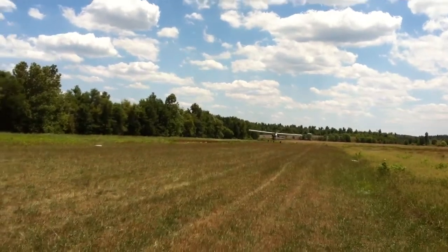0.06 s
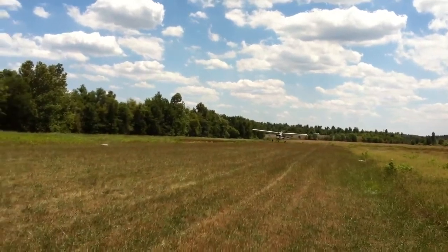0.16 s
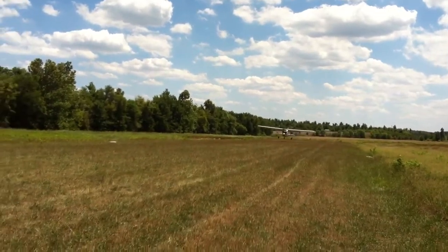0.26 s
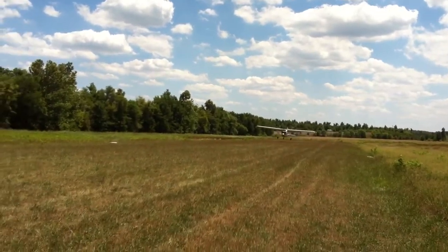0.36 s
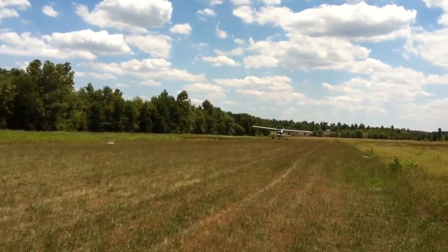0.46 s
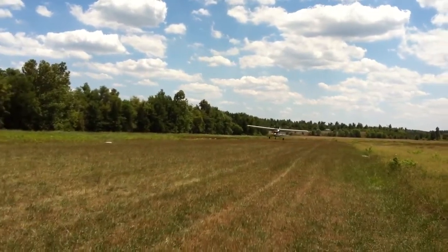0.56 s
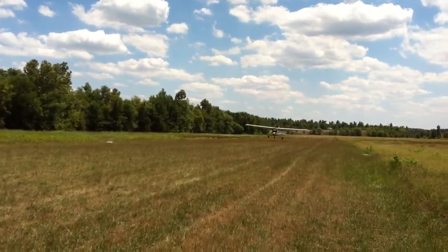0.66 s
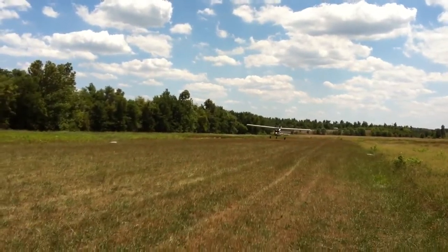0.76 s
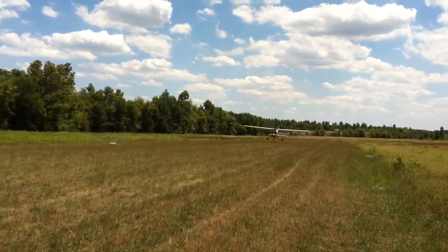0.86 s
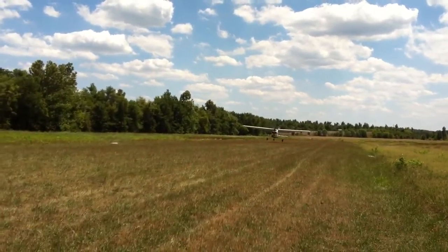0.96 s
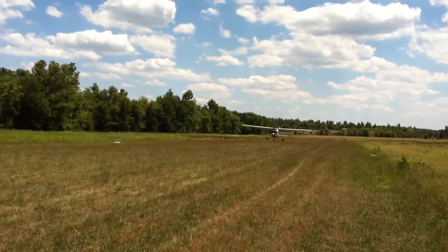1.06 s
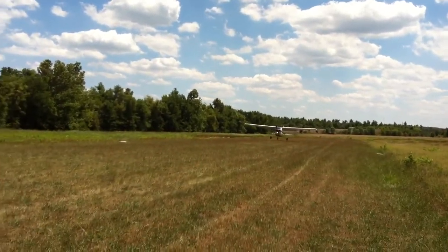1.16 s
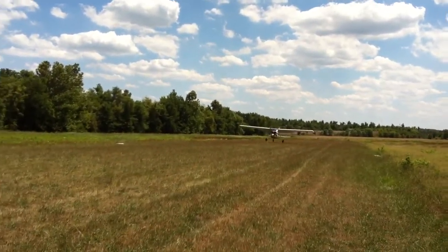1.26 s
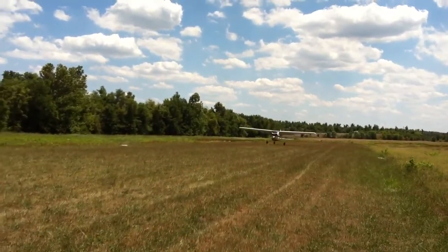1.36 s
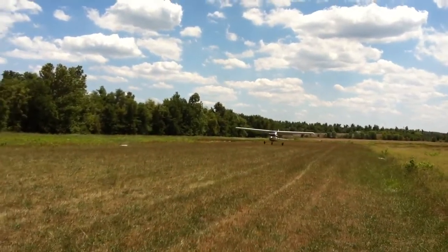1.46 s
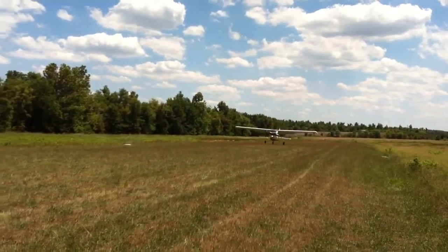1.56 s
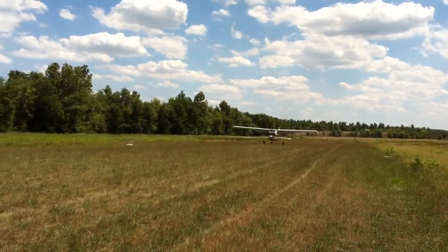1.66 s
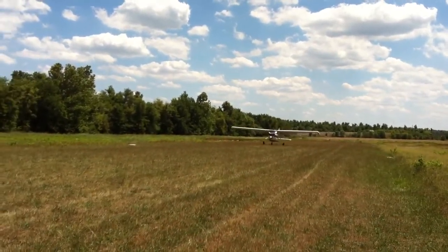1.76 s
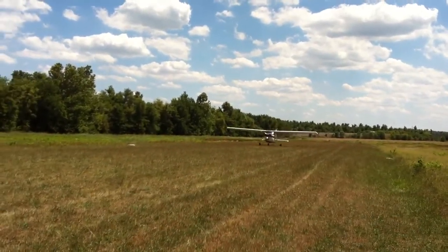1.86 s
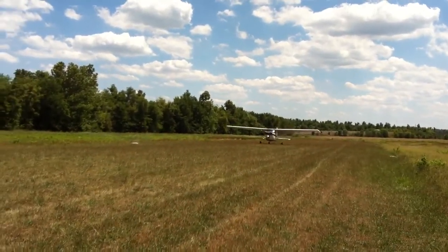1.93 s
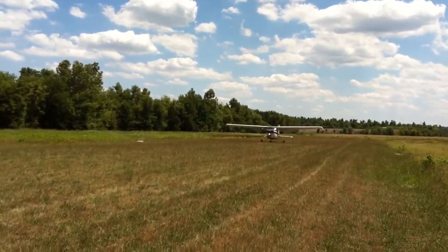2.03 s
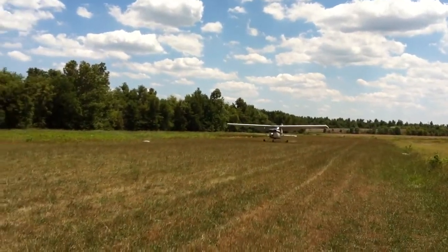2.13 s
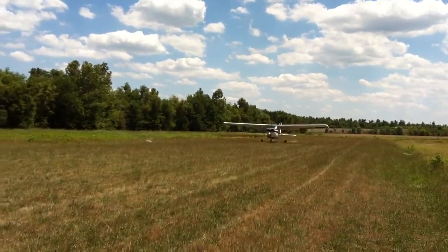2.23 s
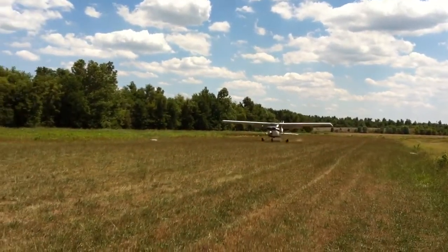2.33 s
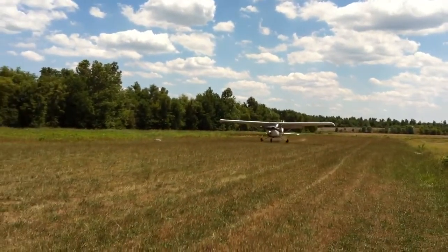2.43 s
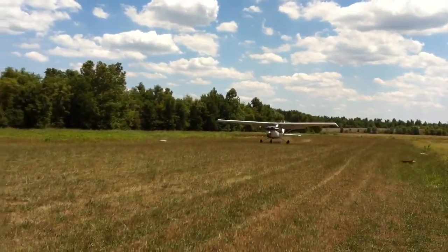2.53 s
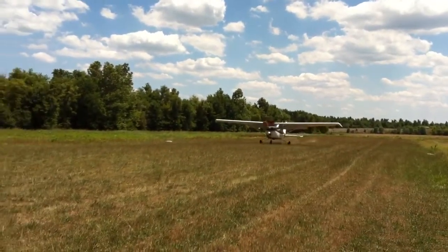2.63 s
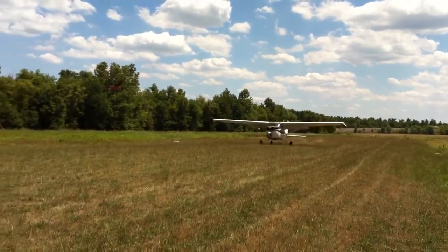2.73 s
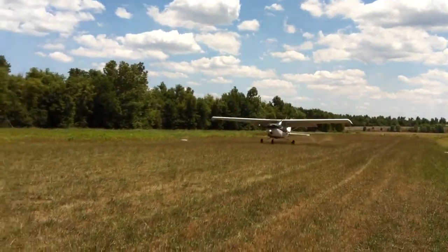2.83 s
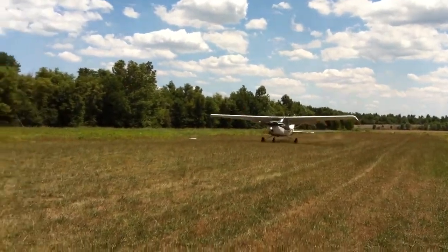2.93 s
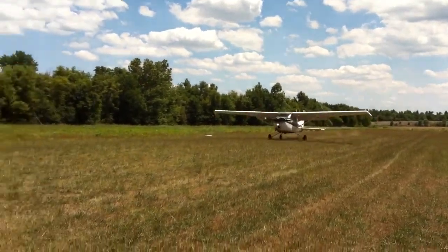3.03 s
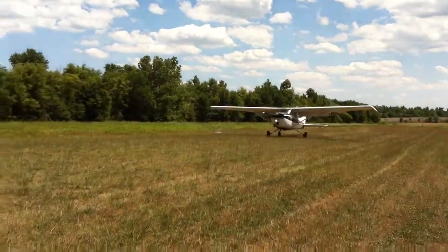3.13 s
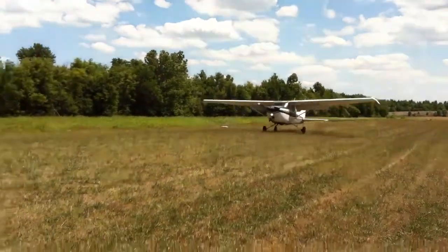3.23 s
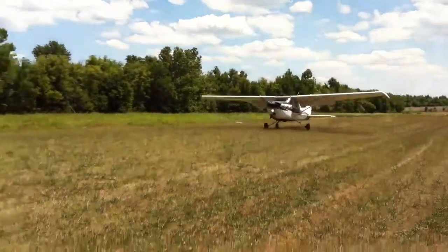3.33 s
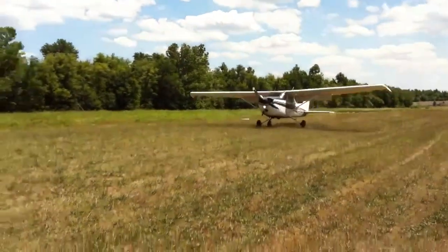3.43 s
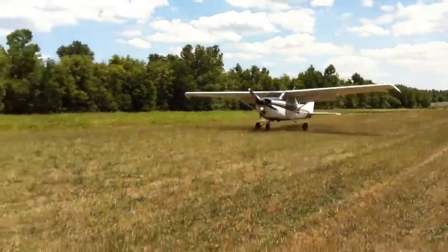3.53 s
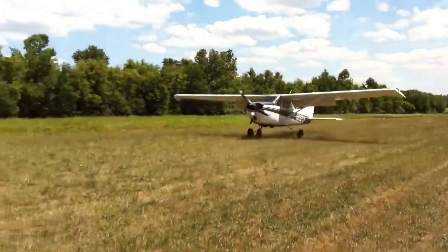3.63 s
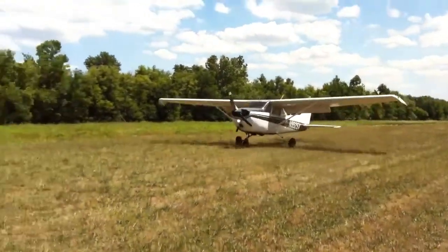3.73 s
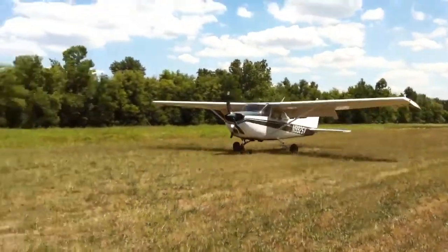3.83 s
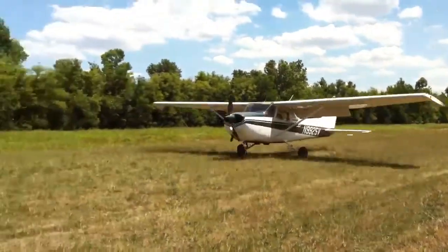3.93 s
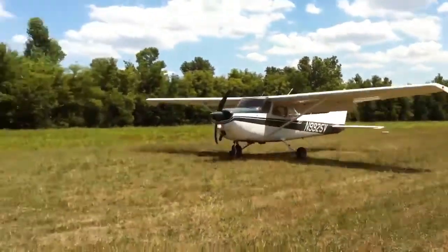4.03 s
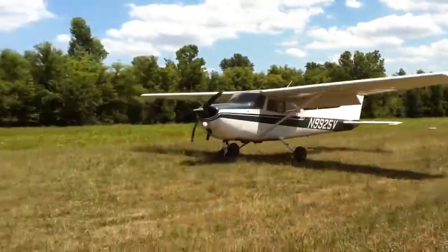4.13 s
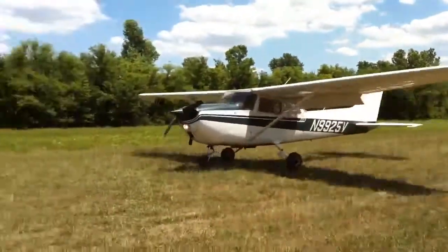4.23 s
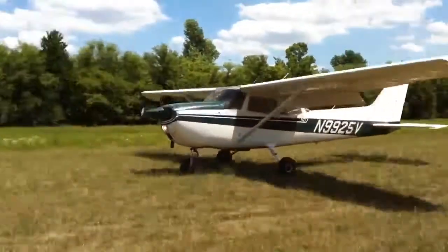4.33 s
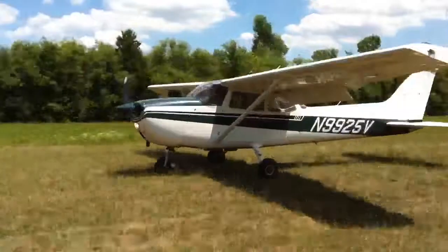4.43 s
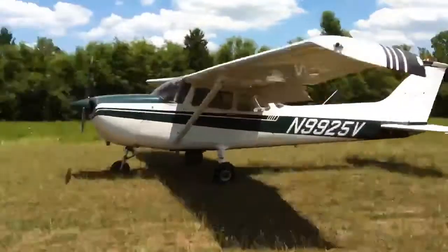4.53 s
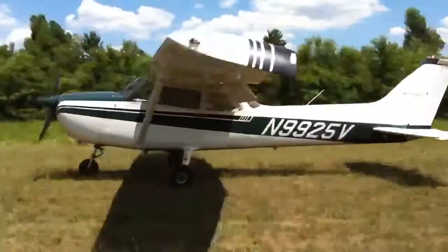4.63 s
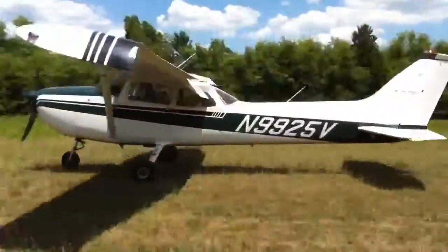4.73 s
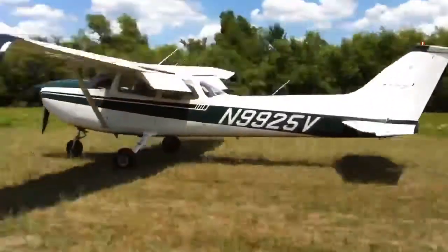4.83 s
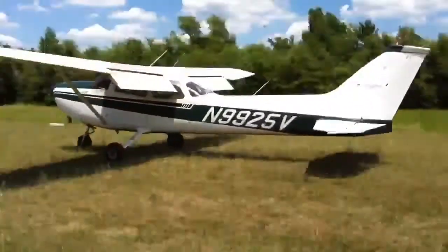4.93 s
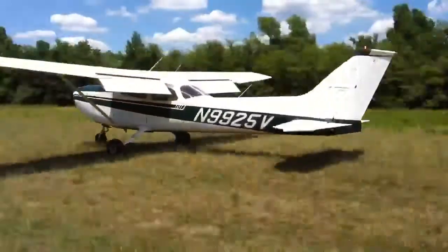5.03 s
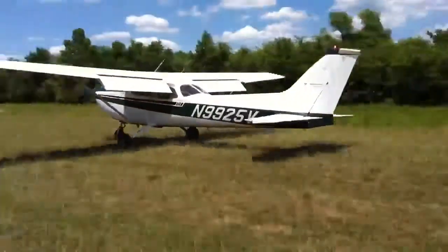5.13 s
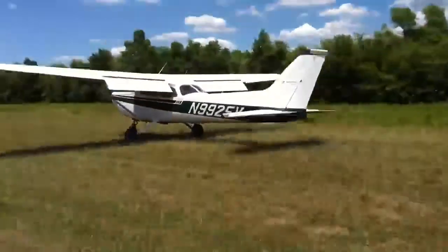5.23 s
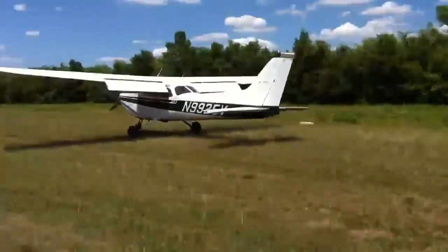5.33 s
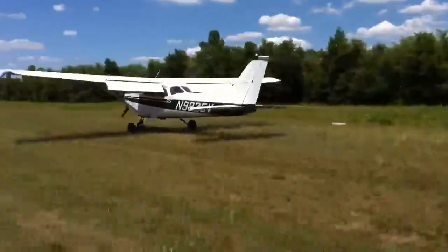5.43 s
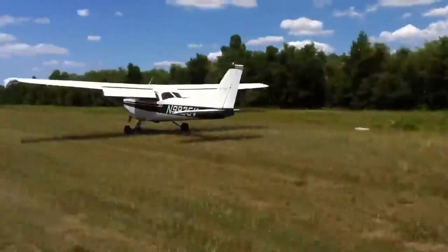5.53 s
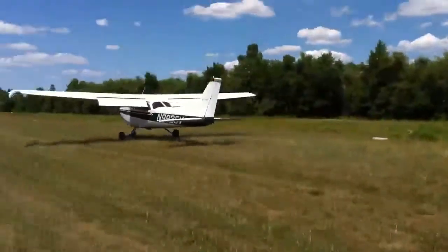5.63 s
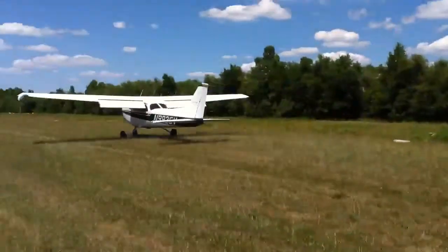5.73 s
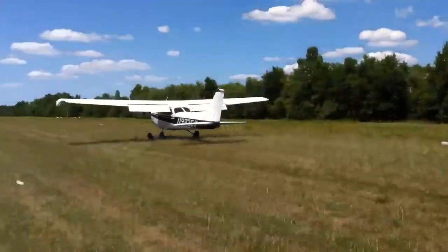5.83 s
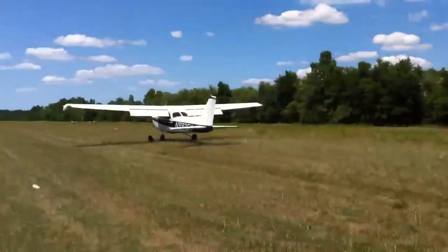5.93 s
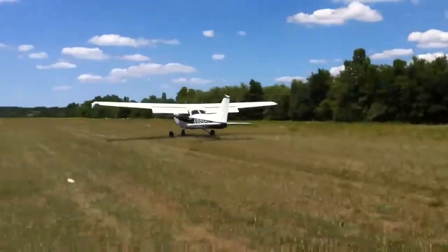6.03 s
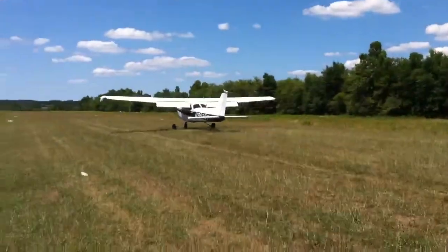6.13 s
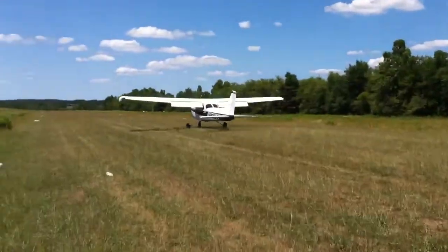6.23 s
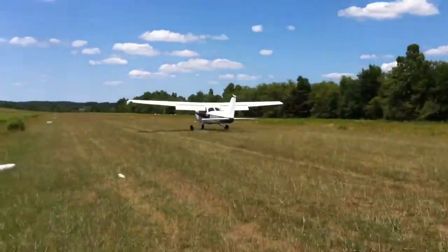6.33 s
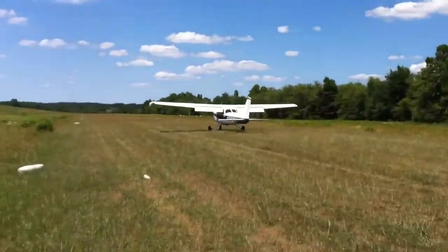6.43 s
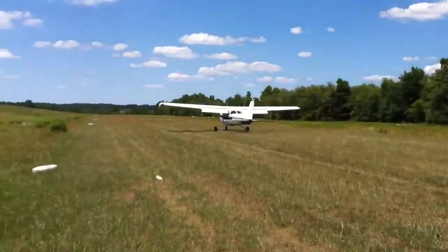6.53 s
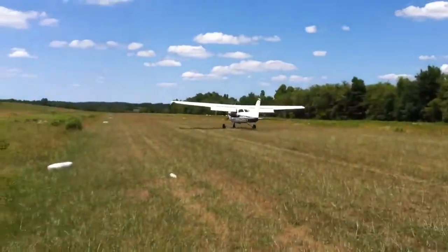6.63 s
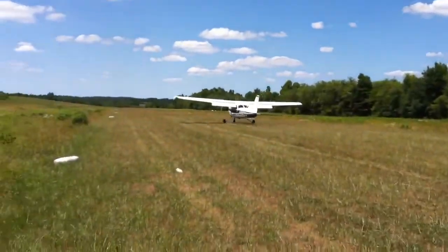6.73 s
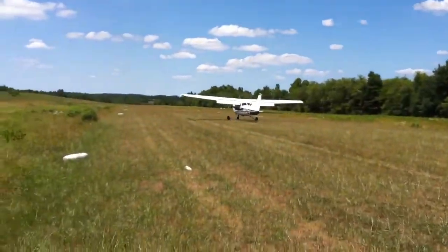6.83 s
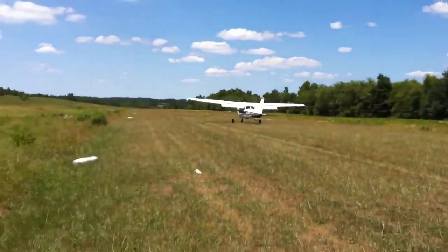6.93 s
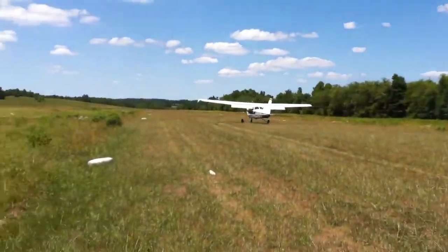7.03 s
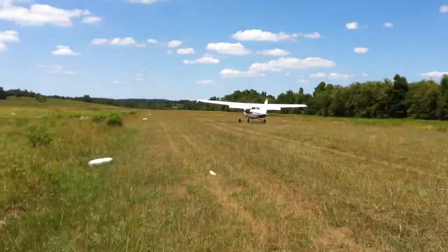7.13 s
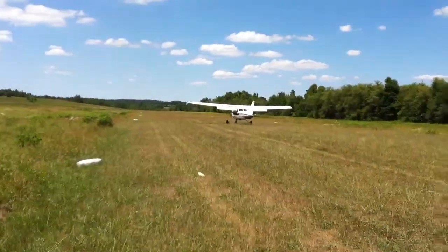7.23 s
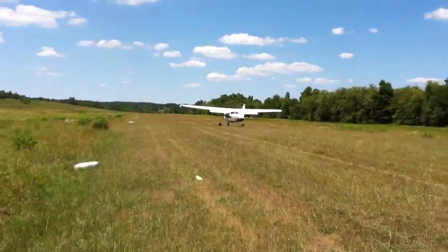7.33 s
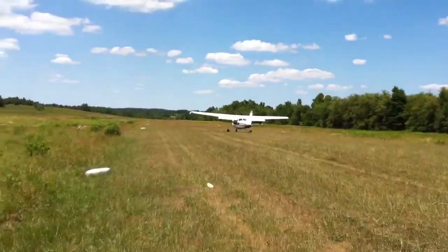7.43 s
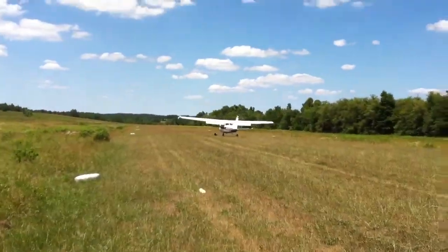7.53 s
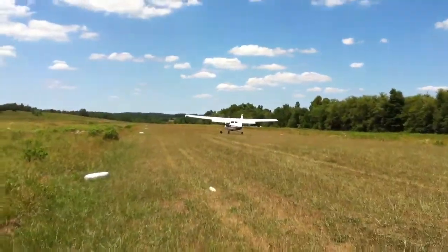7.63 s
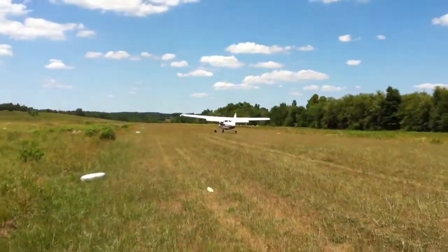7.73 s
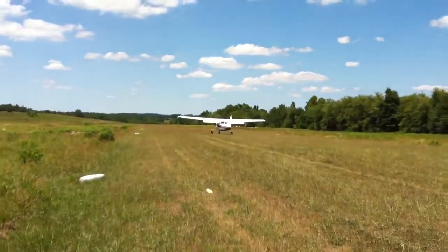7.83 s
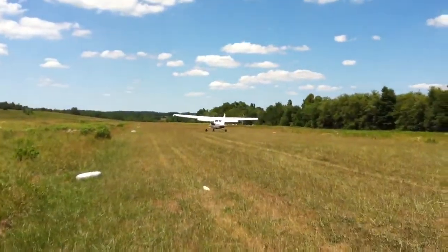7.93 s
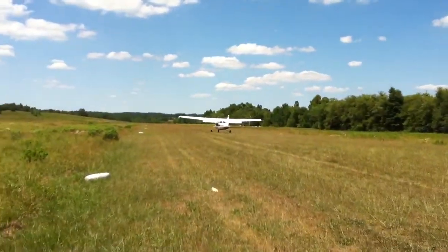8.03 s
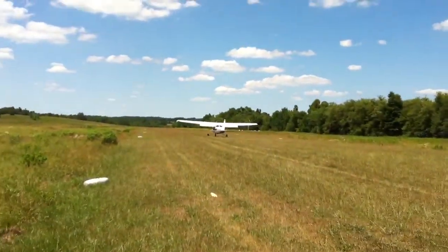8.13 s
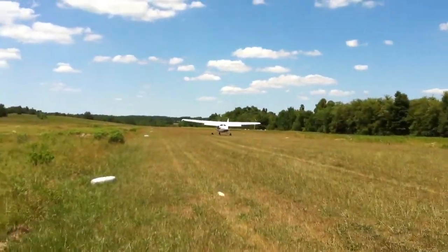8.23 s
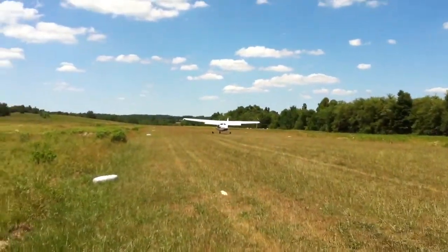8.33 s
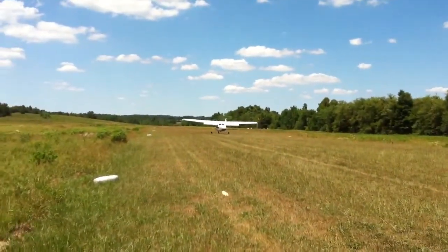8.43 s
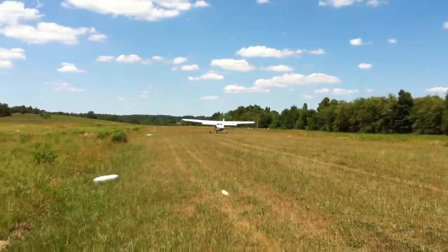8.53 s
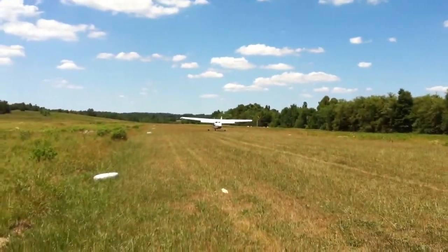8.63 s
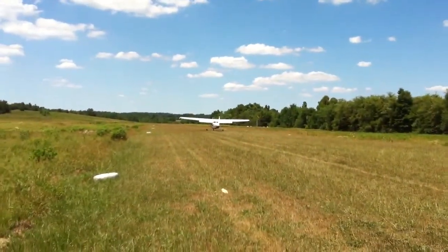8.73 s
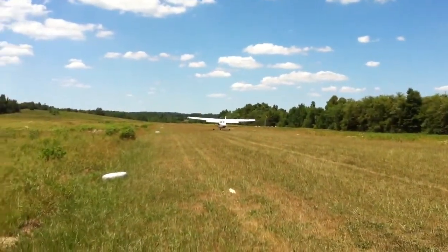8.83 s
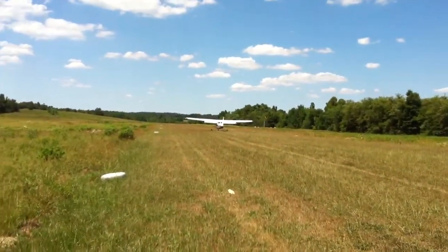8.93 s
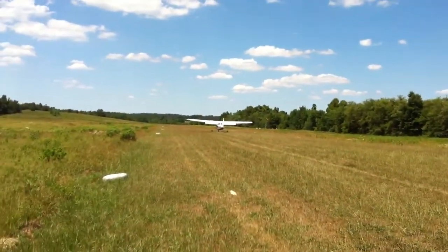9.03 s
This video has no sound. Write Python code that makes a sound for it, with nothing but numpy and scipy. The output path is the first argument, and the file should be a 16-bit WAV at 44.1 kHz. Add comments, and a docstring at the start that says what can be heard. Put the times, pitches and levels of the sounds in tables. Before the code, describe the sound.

Heard from the edge of an open field, a light plane's pulsing exhaust and raspy propeller build from a distance. About halfway through it rolls past close and loud, wheels crunching over dry grass, metal rattling on bumps and brakes faintly singing, as its wash rumbles on the microphone. The drone then falls in pitch and recedes, leaving room for a few small nearby rustles of cloth and snaps of stalks.

```python
"""A light single-engine propeller plane rolls along a dry grass strip, passes a few metres off and recedes.
Its firings drive uneven exhaust thuds and ring the tailpipe; the blades drone and rasp and the engine
clatters, all falling in pitch by the Doppler effect. The tyres hiss and crunch, bumps rattle the airframe,
the brakes sing faintly and the propeller's wash buffets the microphone.
As the plane fades, clothing rustles and dry stalks crackle close by, over the faint air of the field."""
import sys
import numpy as np
from scipy import signal
from scipy.fft import rfft, irfft, next_fast_len
from scipy.io import wavfile
from scipy.ndimage import uniform_filter1d, map_coordinates

SR = 44100
rng = np.random.default_rng(int(sys.argv[2]) if len(sys.argv) > 2 else 0)


def store_wav(level_fs):
    """Save 16-bit WAV to argv[1]."""
    pcm = np.round(np.clip(np.atleast_2d(level_fs), -1, 1) * 32767)
    wavfile.write(sys.argv[1], SR, pcm.T.astype(np.int16))


N = 399987

# Spectra of the sources. Each row: frequency in Hz, relative spectral level in dB.
AIR_SPECTRUM = [(30, -13), (150, 6), (450, -8), (900, -7), (2200, -16), (4500, -19), (8000, -21),
                (11000, -24), (16000, -23)]
CLOTH_SPECTRUM = [(400, -29), (950, -2.5), (1500, -10.5), (2300, -3.5), (3800, -8.5), (8000, -4),
                  (11000, -5), (14000, -8), (16000, -17)]
WASH_SPECTRUM = [(25, -10), (45, -13), (75, -9), (105, 3), (150, 3), (400, -49)]
RATTLE_SPECTRUM = [(300, -38), (750, 2), (1200, -12.5), (2250, 5), (3200, 1.5), (4500, -7.5), (6200, 1),
                   (9000, -2.5), (10800, -9), (16000, -13)]
TYRE_SPECTRUM = [(900, -14), (3300, -16.5), (4000, -12), (5050, -10), (5600, -1.5), (7400, 0.5),
                 (8700, 3.5), (9600, 0.5), (10600, -8.5), (13000, -4.5), (16000, -30)]
STRAW_SPECTRUM = [(5000, -5), (9500, -18), (11000, 1), (12500, 1.5), (14500, 2), (16000, -13)]
CLATTER_SPECTRUM = [(150, -24.5), (380, -11), (500, -1), (720, 0.5), (900, 0.5), (1200, -1.5), (1580, 0),
                    (1900, -0.5), (2220, 1.5), (2600, -2.5), (3450, -5), (3950, -15.5), (7000, -8),
                    (16000, -83)]
GAS_SPECTRUM = [(25, -43.5), (70, -34), (110, -7), (170, 1.5), (230, 0.5), (310, -1.5), (400, -8),
                (480, -13.5), (1200, -84)]
THUD_SPECTRUM = [(25, -45), (55, -20), (95, -5.5), (150, 1), (205, 3.5), (320, -6), (420, -18), (800, -12),
                 (1500, -25), (4000, -59)]
FIBRE_SPECTRUM = [(600, -2), (1700, 9), (4500, 6.5), (6000, 4.5), (9300, 7), (10800, -9), (16000, -15)]
WAKE_SPECTRUM = [(2500, -24), (3900, 9), (4900, -6), (7000, -30)]
RASP_SPECTRUM = [(400, -22.5), (620, -1), (860, 0), (1100, -7), (1350, -5.5), (1900, -15), (4000, -59)]
PIPE_SPECTRUM = [(300, -46.5), (560, -10.5), (720, -4.5), (880, -7), (1400, -54), (4000, -62)]
COWL_SPECTRUM = [(450, -21), (720, 1), (1000, 1), (1300, 2), (1650, -5), (1950, -18), (2800, -26),
                 (3400, -18), (3900, -34)]
# Clothing brushes and stalks crack. Each row: peak time in seconds, level in dB, length in seconds,
# resonance in Hz.
CLOTH_BRUSHES = [(7.283, -52.5, 0.017, 2300), (7.522, -57, .03, 1400), (7.576, -50.5, 0.008, 1000),
                 (7.627, -54, .009, 1700), (8.748, -55, 0.005, 1400), (8.782, -54.5, .018, 1350)]
STALK_CRACKS = [(.208, -58.5, .0015, 3500), (7.701, -51.5, 0.005, 4800), (7.718, -50, 0.002, 8000),
                (7.737, -49.5, .0022, 8500), (7.814, -49, .003, 7800), (7.891, -48.5, .0032, 6500),
                (7.965, -54.5, 0.0013, 7130), (8.04, -54.5, 0.0017, 4500), (8.203, -55, 0.0057, 7380),
                (8.227, -54.5, 0.0017, 7000), (8.311, -47.5, .0036, 6800), (8.312, -44, 0.0062, 2200),
                (8.341, -45, .0015, 8350)]
# Brake squeals. Each row: peak time in seconds, level in dB, length in seconds, then pitch, upward bend
# and random waver in Hz.
BRAKE_SQUEALS = [(2.725, -57, .05, 6980, 520, 25), (4.968, -44, .006, 8650, 0, 180),
                 (5.135, -42, .02, 8880, 0, 130), (5.285, -39.5, .026, 8790, 0, 120),
                 (5.44, -49, .035, 9450, 0, 220), (5.78, -54, .11, 9380, 0, 150)]
# The hardest bumps. Each row: time in seconds, peak level in dB, length in seconds, treble gain in dB.
HARD_BUMPS = [(3.335, -37, .006, 4), (3.463, -27, 0.0071, -7), (3.559, -29.5, 0.011, -5),
              (3.843, -26.5, 0.0054, -1), (4.01, -23.5, 0.005, -12), (4.115, -16.5, 0.0046, -3),
              (4.36, -20.5, 0.026, -3), (4.521, -21, 0.014, 3), (4.572, -12.5, 0.0061, -5),
              (4.65, -16, 0.0098, -3), (5.04, -21.5, 0.0044, -13), (5.123, -28.5, 0.014, 6.5),
              (5.269, -22, 0.0051, -4), (5.287, -23, 0.015, -1.5), (5.414, -37, 0.0049, 14.5),
              (5.772, -27.5, 0.0089, -5), (5.795, -24.5, 0.0027, -7), (5.839, -27, 0.0025, -4.5),
              (6.07, -30, 0.004, -3), (6.119, -31, 0.0033, -3), (6.452, -43, 0.0082, 5)]
# Modes of the engine's sheet metal. Each row: frequency in Hz, bandwidth in Hz, relative level in dB.
METAL_MODES = [(906, 85, -11), (1616, 150, -9.5), (2190, 100, -10), (2920, 170, -14.5)]
# Propeller tones. Each row: multiple of the blade rate, relative level in dB.
BLADE_HARMONICS = [(2, -3), (4, 4.5), (7, -7), (10, -6.5), (13, -8)]
# The engine winds down, stumbling once. Each row: time in seconds, firings per second at the source.
FIRING_RATE = [(0, 32.29), (1.2, 31.59), (1.76, 31.44), (1.88, 29.56), (2.08, 30.74), (2.7, 30.6),
               (3.7, 30.11), (4.2, 29.04), (5.2, 29.03), (8, 28.01)]
# The plane's sound swells and dips. Each row: time in seconds, gain in dB.
PASS_SURGES = [(0, -1), (1.9, -4.5), (2.4, 0.5), (2.76, 0.5), (2.96, 4), (3.46, 3), (3.88, -0.5),
               (4.08, 1.5), (4.44, -4), (4.58, 2), (4.76, -1.5), (4.92, -3), (5.28, 4), (5.58, -0.5),
               (6.06, 2), (6.2, 0), (7.04, 0), (7.22, 3.5), (8.12, -2), (8.35, 0), (9.07, 0)]
# Blade rasp and tyre hiss along the run. Each row: time in seconds, rasp gain in dB, hiss gain in dB.
RASP_AND_HISS = [(0, -4, -1), (0.9, 3, 0.5), (1.4, 2, 3.5), (1.9, 1.5, 4.5), (2.3, 3, -0.5),
                 (2.55, -6.5, -0.5), (3.02, -4, -1), (3.25, -21, -0.5), (3.7, 1, -3.5), (4.3, 8.5, 1.9),
                 (4.9, 0, -2.5), (5.3, -4, 2)]
# The low sound as the plane turns its tail to the listener. Each row: time in seconds, then the gains
# of thuds, gas rumble and propeller in dB.
LOW_BALANCE = [(0, -8, -11, -4), (0.95, -1.5, -10, -4.5), (1.47, -2.5, -8.5, -4), (1.68, 3.5, -7, -3),
               (1.85, -1, -4, -3), (2.1, -1.5, -3.5, -4), (2.35, -4, 0.5, -6), (2.75, -9, -5.5, -11),
               (3.0, -9, -2.5, -12.5), (3.55, -8, -5.5, -13), (4.3, -9, 1.5, -14.5), (4.78, -11, 1.5, -18),
               (5.03, -13, -3, -19), (5.38, -12.5, -3, -22), (6.4, -11.5, -1.5, -22), (7.7, -13, -4.5, -22),
               (9.07, -13, -4.5, -22)]

# How each source carries: gain abreast in dB, loss per doubling of distance in dB, gain tail-on in dB.
EXHAUST_CARRY, GROWL_CARRY, CLATTER_CARRY = (-32.5, 8.1, 2.5), (-41.5, 14.8, 3.5), (-32, 11.12, 0.87)
TYRE_CARRY, RASP_CARRY = (-33.5, 12.88, 0.46), (-53, 6.8, -8.5)
CLOSEST_S, CLOSEST_M, SPEED_M_PER_S, SOUND_M_PER_S = 4.55, 9, 18, 343
TIME = np.arange(N) / SR


def amp(db):
    """Amplitude ratio of a level in decibels."""
    return 10 ** (np.asarray(db) / 20)


def unit(x):
    """Normalisation to rms 1."""
    return x / np.sqrt(np.mean(x ** 2) + 1e-20)


def curves(rows):
    """Linear interpolation in time of each column after the first."""
    times, *columns = np.transpose(rows)
    return [np.interp(TIME, times, column) for column in columns]


def noise():
    """White Gaussian noise."""
    return rng.standard_normal(N)


def wobble(rate):
    """Smooth random modulation: a spline through rate knots a second."""
    return map_coordinates(rng.standard_normal(int(N * rate / SR) + 4), [TIME * rate])


def coloured(x, spectrum):
    """Minimum-phase filtering of x by a spectrum, at rms 1."""
    size = 2 * next_fast_len(N // 2 + 8192)
    hz, db = np.transpose(spectrum)
    gain = amp(np.interp(np.log(np.fft.rfftfreq(size, 1 / SR) + 1), np.log(hz), db))
    cepstrum = irfft(np.log(gain))
    cepstrum[1:size // 2] *= 2  # folding the cepstrum makes the filter causal
    cepstrum[size // 2 + 1:] = 0
    return unit(irfft(rfft(x, size) * np.exp(rfft(cepstrum)))[:N])


def resonate(x, hz, q):
    """Forced response of one resonator with quality factor q, at rms 1."""
    return unit(signal.lfilter(*signal.iirpeak(hz, q, SR), x))


def grains(rate, spread_db):
    """Shot noise: clicks of very unequal size, rate a second, at rms 1."""
    sizes = amp(spread_db * np.minimum(rng.exponential(size=N), 4))
    return unit((rng.random(N) < rate / SR) * sizes * noise())


def ticks(rate, low_hz, high_hz, ring_s, spread_db):
    """Damped free vibrations at random times and pitches, rate a second, at rms 1."""
    when, pitch, strength = np.hsplit(rng.random((int(rate * N / SR), 3)), 3)
    t = np.arange(SR // 100) / SR
    hz = low_hz + (high_hz - low_hz) * pitch
    rings = amp(spread_db * strength ** 3) * np.sin(2 * np.pi * hz * t) * np.exp(-t / ring_s)
    at = (when * N).astype(int) + np.arange(len(t))
    return unit(np.bincount(at.ravel(), rings.ravel(), N)[:N])


def swell(peak_s, db, length_s):
    """Envelope of a transient: a Gaussian rise and a slower exponential decay."""
    age = (TIME - peak_s) / length_s
    return amp(db) * np.exp(-np.minimum(np.where(age < 0, age * age, age / 2), 20))


def scattered(start_s, end_s, length_s, spread_db, count):
    """Envelope of count unequal transients strewn over a span of time."""
    return sum(swell(start_s + (end_s - start_s) * (k + when) / count, -spread_db * weak, length_s)
               for k, (when, weak) in enumerate(rng.random((count, 2))))


def firing_gate(cycles, depth):
    """Amplitude modulation with one swell per firing, at rms 1."""
    return unit(np.exp(depth * np.cos(2 * np.pi * cycles)))


def bearing():
    """Geometry of a straight pass: distance in metres, and aspect from -1 head-on to 1 tail-on."""
    along = SPEED_M_PER_S * (TIME - CLOSEST_S)
    distance = np.hypot(along, CLOSEST_M)
    return distance, along / distance


def carried(closest_db, doubling_db, behind_db):
    """Distance loss and directivity set the gain of a source on the plane, along with the surges."""
    distance, tail_on = bearing()
    loss_db = doubling_db * np.log2(distance / CLOSEST_M)
    return amp(closest_db - loss_db + behind_db * tail_on + curves(PASS_SURGES)[0])


def doppler(x, shift, passing_s):
    """Doppler effect: a changing delay raises the pitch on approach and lowers it in retreat."""
    path = np.hypot(TIME - CLOSEST_S, passing_s)
    return map_coordinates(x, [(TIME - shift * (path - path[0])) * SR], mode="wrap")


def ground_effect(x, dip_hz=505, dip_q=3.8, dip_db=-4.5, patchy_db=1.3):
    """Soft ground absorbs one band of the passing sound, whose colour also shifts in patches."""
    band = signal.lfilter(*signal.iirpeak(dip_hz, dip_q, SR), x)
    hz, _, spectra = signal.stft(x - (1 - amp(dip_db)) * band, SR, nperseg=512)
    patches = uniform_filter1d(rng.standard_normal(spectra.shape), size=4, axis=0)
    patches = unit(uniform_filter1d(patches, size=20, axis=1))
    reach = np.minimum(hz / dip_hz / 2, 1)[:, None]  # long waves come through steadily
    return signal.istft(spectra * amp(patchy_db * reach * patches))[1][:N]


def field_air():
    """Ambient noise of the open field: faint, steady and strongest in the bass."""
    return amp(-61.5) * coloured(noise(), AIR_SPECTRUM)


def clothing():
    """Friction of nearby cloth makes bursts of grainy noise, each with its own resonance."""
    cloth = coloured(noise() + .5 * grains(rate=5800, spread_db=9), CLOTH_SPECTRUM)
    return sum(swell(s, db, length) * (amp(-3) * cloth + resonate(cloth, hz, q=4))
               for s, db, length, hz in CLOTH_BRUSHES)


def dry_stalks(q=1.5):
    """Brittle fracture excites broad resonances in nearby stalks; finer ones crackle at random."""
    snaps = noise() + .5 * ticks(rate=1400, low_hz=3050, high_hz=9830, ring_s=.0024, spread_db=3)
    fibres = coloured(snaps, FIBRE_SPECTRUM)
    cracks = sum(swell(s, db, length) * resonate(fibres, hz, q) for s, db, length, hz in STALK_CRACKS)
    crackling = amp(-56) * scattered(start_s=7.4, end_s=8.6, length_s=.0012, spread_db=6, count=38)
    return cracks + crackling * resonate(fibres, 6000, q)


def propeller_wash(peak_s=4.35, length_s=.55):
    """Turbulent pressure buffets the microphone in one deep gust as the propeller comes abreast."""
    gust = amp(-45.5) / (1 + ((TIME - peak_s) / length_s) ** 2) ** 1.5
    return gust * coloured(noise(), WASH_SPECTRUM)


def brakes():
    """Friction-excited vibration: pads graze the discs and sing in thin, unsteady tones."""
    song = np.zeros(N)
    for s, db, length, hz, bend_hz, waver_hz in BRAKE_SQUEALS:
        bend = np.minimum(((TIME - s) / length / 2) ** 2, 2)
        pitch = hz + bend_hz * bend + waver_hz * wobble(600)
        song += swell(s, db, length) * unit(np.sin(2 * np.pi * np.cumsum(pitch) / SR))
    return song


def airframe(crest_db=8.5, split_hz=4200):
    """Impact excitation: bumps shake gear and metal skin into bursts of contacts that add in power."""
    low_power = sum(swell(s, db - crest_db, length) ** 2 for s, db, length, _ in HARD_BUMPS)
    high_power = sum(swell(s, db + treble_db - crest_db, length) ** 2
                     for s, db, length, treble_db in HARD_BUMPS)
    rough_ground = scattered(start_s=3.8, end_s=4.2, length_s=.005, spread_db=5, count=22)
    rough_power = (amp(-5) * carried(*TYRE_CARRY) * rough_ground) ** 2
    contacts = ticks(rate=1800, low_hz=600, high_hz=10000, ring_s=.002, spread_db=11)
    rattle = coloured(noise() + .5 * contacts, RATTLE_SPECTRUM)
    dull = signal.sosfiltfilt(signal.butter(2, split_hz, fs=SR, output="sos"), rattle)
    return np.sqrt(low_power + rough_power) * dull + np.sqrt(high_power + rough_power) * (rattle - dull)


def tyres(cycles, flutter_db=1):
    """Wheels and slipstream crush dry grass, whose many small fractures merge into a crunching hiss."""
    flutter = amp(flutter_db * wobble(60)) * firing_gate(cycles, depth=.32)
    stalks = ticks(rate=2000, low_hz=2050, high_hz=10760, ring_s=.0014, spread_db=17)
    crush = coloured(noise() + .55 * stalks, TYRE_SPECTRUM)
    straw = coloured(noise() + .55 * grains(rate=300, spread_db=3.5), STRAW_SPECTRUM)
    near = 1 / (1 + ((TIME - 4.5) / .88) ** 2)  # the finest crackle carries only a short way
    behind = .5 + .5 * np.tanh((TIME - CLOSEST_S) / .15)
    wake = behind * coloured(noise(), WAKE_SPECTRUM)  # the slipstream's lower hiss behind the wing
    return flutter * (crush + amp(-4) * near * straw + amp(-10) * wake)


def blade_rasp(cycles):
    """Turbulence in each blade's wake gives a pulsing band of noise near 900 Hz."""
    return coloured(noise() * firing_gate(cycles, depth=.7), RASP_SPECTRUM)


def tailpipe_growl(cycles, ring_hz=755, width_hz=110):
    """Pipe resonance: a throaty note swells with each firing and falls as the plane goes by."""
    q = ring_hz / width_hz
    ring = resonate(resonate(noise(), ring_hz, q), ring_hz, q)
    return firing_gate(cycles, depth=.19) * doppler(ring, shift=.07, passing_s=.5)


def engine_clatter(cycles, flutter_db=2, pipe_fade_db_per_s=10):
    """Forced vibration: valve gear and blade swish ring the metal, the cowl ahead and the pipe behind."""
    def drive():
        """Fluttering noise excitation that pulses faintly with the firings."""
        return noise() * firing_gate(cycles, depth=.03) * amp(flutter_db * wobble(70))

    behind = .5 + .5 * np.tanh((TIME - CLOSEST_S) / .7)
    metal = sum(amp(db) * resonate(drive(), hz, hz / width) for hz, width, db in METAL_MODES)
    cowl = amp(-9) * (1 - behind) * coloured(drive(), COWL_SPECTRUM)
    absorbed_db = pipe_fade_db_per_s * np.maximum(TIME - 6.2, 0)  # the ground swallows the pipe's ring
    pipe = amp(-4 - absorbed_db) * behind * coloured(drive(), PIPE_SPECTRUM)
    clatter = amp(-.5) * coloured(drive(), CLATTER_SPECTRUM)
    return doppler(clatter + metal + cowl + pipe, shift=.03, passing_s=.5)


def propeller(cycles, dull_db_per_s=3, rough_db=4):
    """Two blades on a four-cylinder engine pass at the firing rate and radiate harmonics of it."""
    top = BLADE_HARMONICS[-1][0]
    tones = np.zeros(N)
    for k, db in BLADE_HARMONICS:  # the highest wavers most and fades first
        waver_db = rough_db * k / top * wobble(20)
        fade_db = dull_db_per_s * (k / top) ** 2 * TIME
        tones -= amp(db + waver_db - fade_db) * np.cos(2 * np.pi * k * cycles)
    return amp(curves(LOW_BALANCE)[2]) * tones


def exhaust(cycles, uneven_db=2, jitter_s=.00012, weak_share=.084, weak_db=-7, muffler_hz=180):
    """Pulse excitation: each firing sends a thud through the muffler, with a rumble of flowing gas."""
    thud_db, gas_db, _ = curves(LOW_BALANCE)
    firings = np.flatnonzero(np.diff(np.floor(cycles)))
    timing, strength = rng.standard_normal((len(firings), 2)).T
    firings = np.clip(firings + np.round(timing * jitter_s * SR).astype(int), 0, N - 1)
    weak = rng.random(len(firings)) < weak_share  # now and then a cylinder fires weakly
    pulses = np.bincount(firings, -amp(uneven_db * strength + weak_db * weak), N)
    valve_opening = np.hanning(round(.0024 * SR))  # rounds each thud
    thuds = coloured(np.convolve(pulses, valve_opening, "same"), THUD_SPECTRUM)
    flow = firing_gate(cycles, depth=.33)
    gas = flow * doppler(coloured(noise(), GAS_SPECTRUM), shift=.025, passing_s=.505)
    boom = amp(-1) * resonate(gas, muffler_hz, q=1.8)
    far = np.clip(np.abs(TIME - CLOSEST_S) / 5.2, 0, 1)  # at a distance the muffler's boom takes over
    return amp(thud_db) * thuds + amp(gas_db) * ((1 - far) * gas + far * boom)


def scene():
    """Superposition: the plane's sources share one Doppler-shifted firing rate, over the field's sounds."""
    _, tail_on = bearing()
    heard_hz = curves(FIRING_RATE)[0] / (1 + tail_on * SPEED_M_PER_S / SOUND_M_PER_S)
    cycles = .12 + np.cumsum(heard_hz) / SR
    rasp_db, hiss_db = curves(RASP_AND_HISS)
    drone = carried(*EXHAUST_CARRY) * (exhaust(cycles) + propeller(cycles))
    clatter = carried(*CLATTER_CARRY) * engine_clatter(cycles)
    growl = carried(*GROWL_CARRY) * tailpipe_growl(cycles)
    rasp = carried(*RASP_CARRY) * amp(rasp_db) * blade_rasp(cycles)
    rolling = carried(*TYRE_CARRY) * amp(hiss_db) * tyres(cycles)
    air = field_air()
    plane = ground_effect(drone + clatter + growl + rasp + rolling + airframe())
    return (plane + propeller_wash() + brakes() + clothing() + dry_stalks() + air)[None]


def record(dry, low_hz=48, top_hz=15750):
    """Band limiting: the small microphone sheds deep bass, and nothing above top_hz is kept."""
    dry = signal.sosfilt(signal.butter(2, low_hz, "high", fs=SR, output="sos"), dry)
    size = next_fast_len(N + SR // 2)
    passband = np.fft.rfftfreq(size, 1 / SR) < top_hz
    return irfft(rfft(dry, size) * passband, size)[..., :N]


dry = scene()
out = record(dry)
store_wav(out)
```